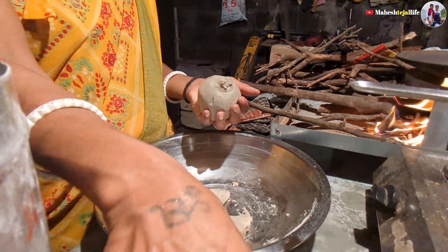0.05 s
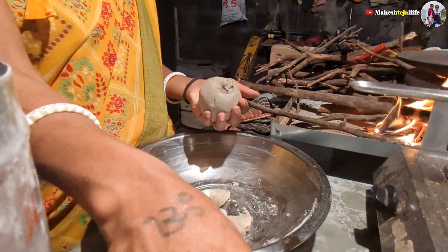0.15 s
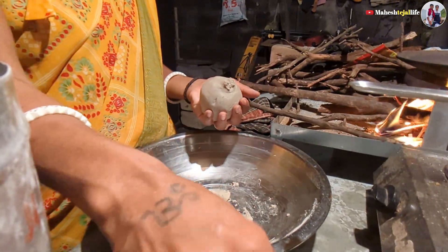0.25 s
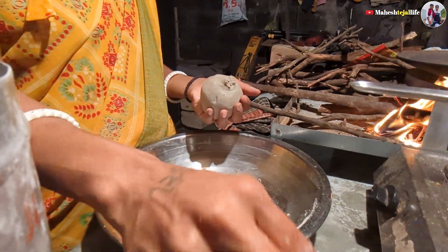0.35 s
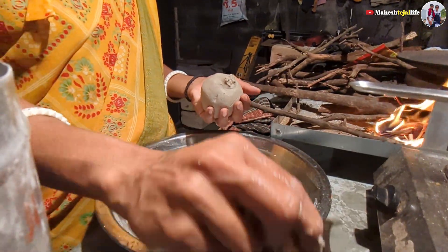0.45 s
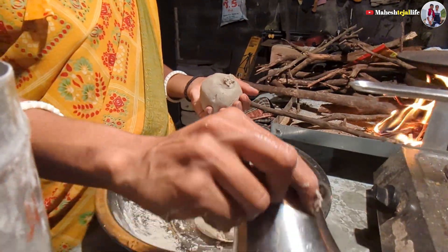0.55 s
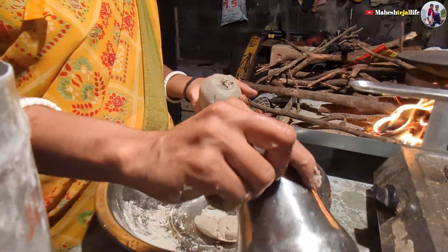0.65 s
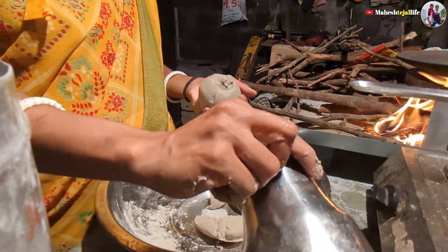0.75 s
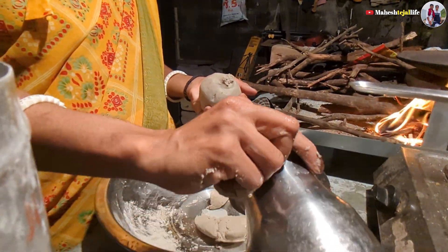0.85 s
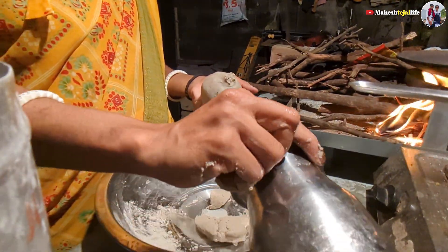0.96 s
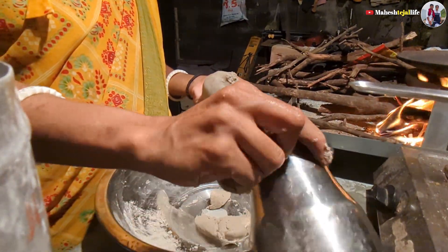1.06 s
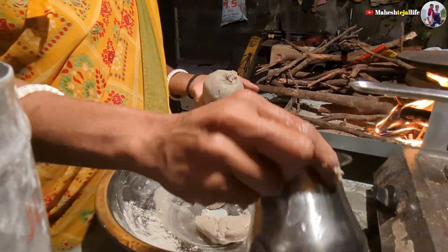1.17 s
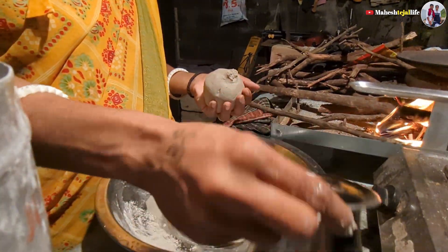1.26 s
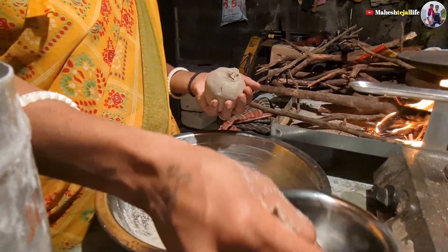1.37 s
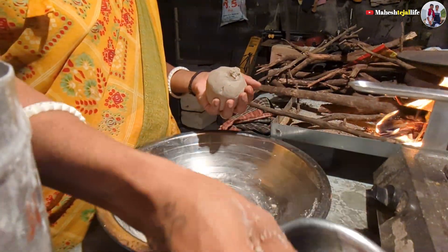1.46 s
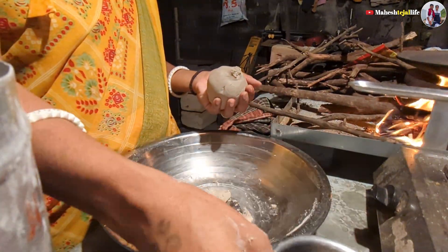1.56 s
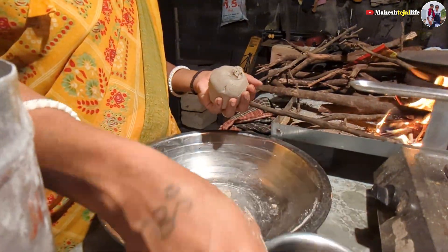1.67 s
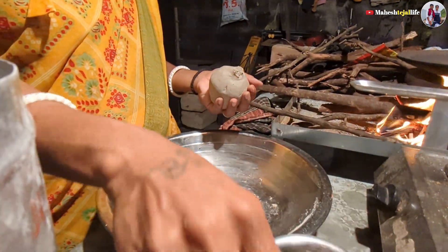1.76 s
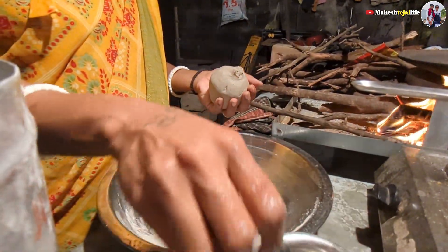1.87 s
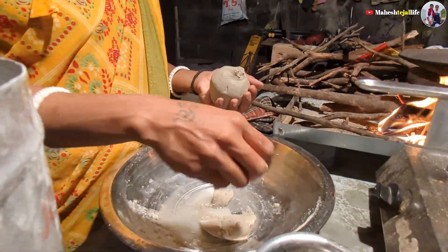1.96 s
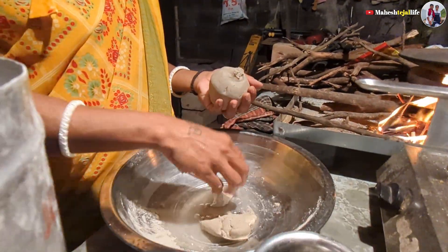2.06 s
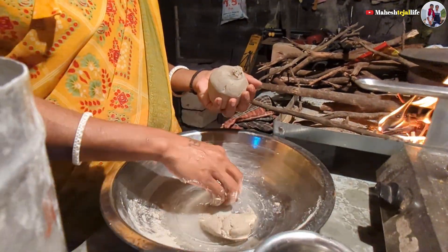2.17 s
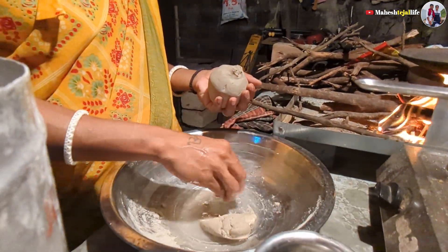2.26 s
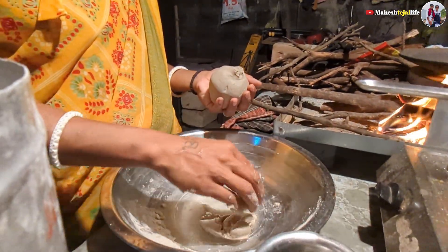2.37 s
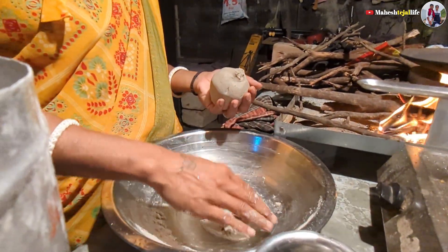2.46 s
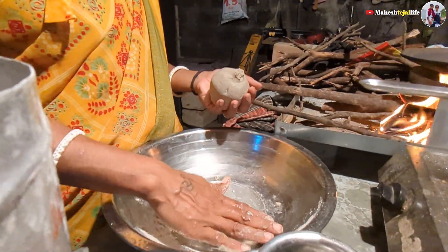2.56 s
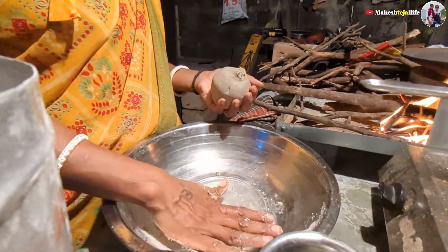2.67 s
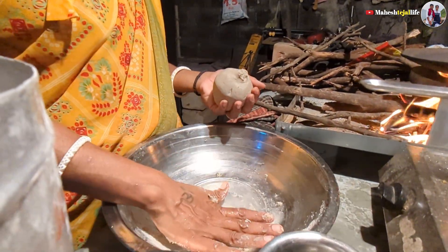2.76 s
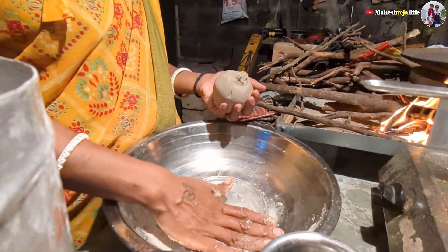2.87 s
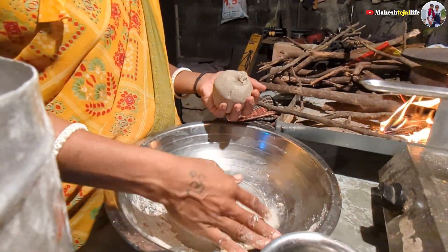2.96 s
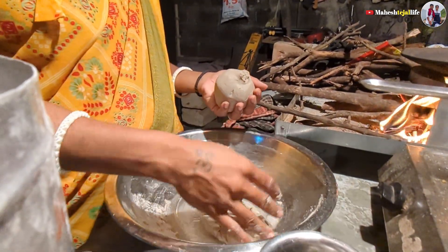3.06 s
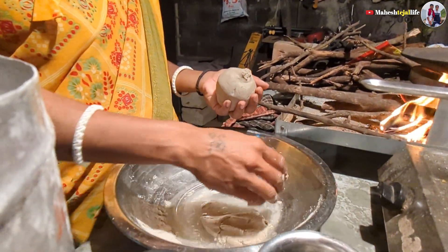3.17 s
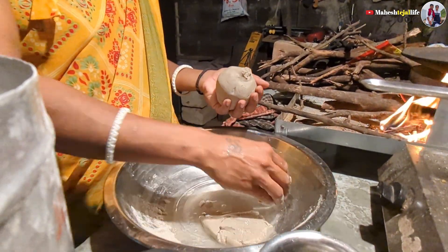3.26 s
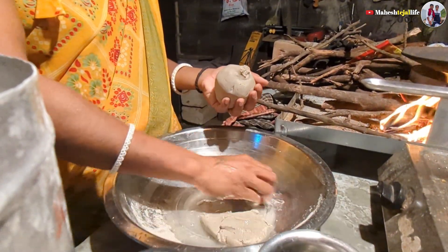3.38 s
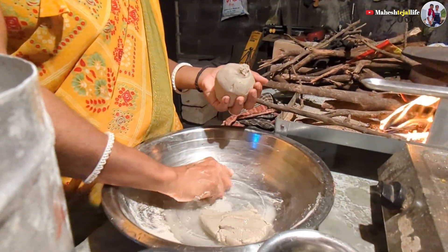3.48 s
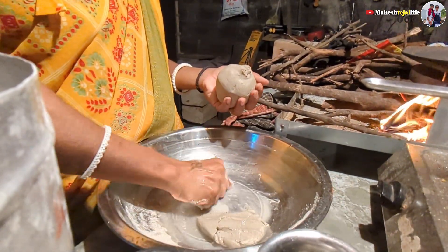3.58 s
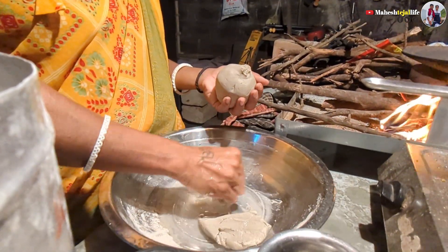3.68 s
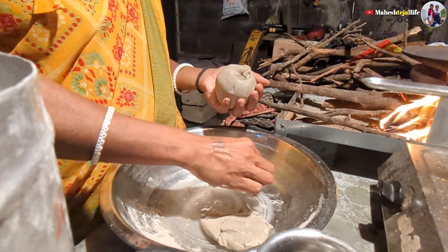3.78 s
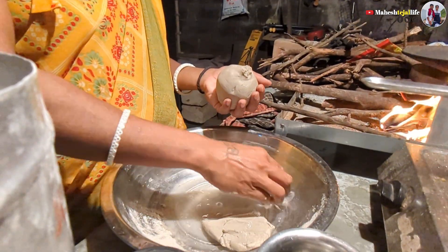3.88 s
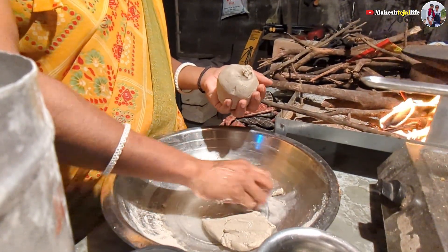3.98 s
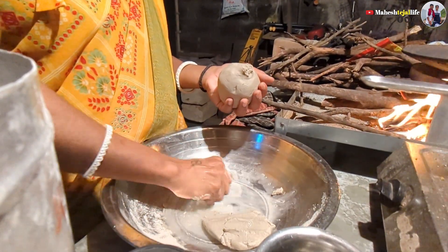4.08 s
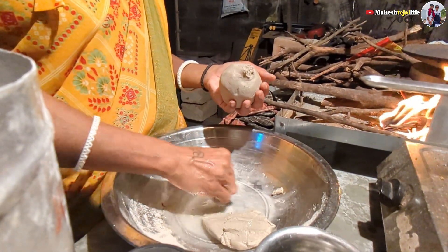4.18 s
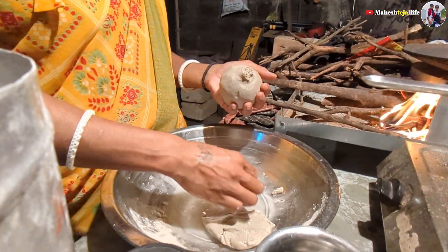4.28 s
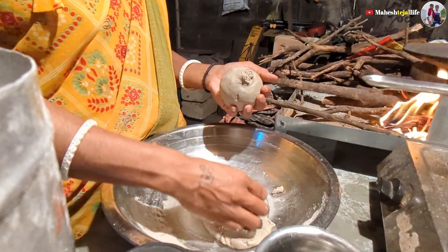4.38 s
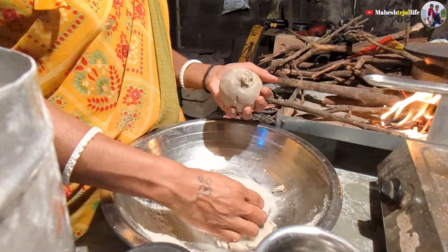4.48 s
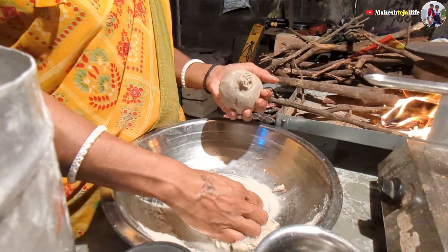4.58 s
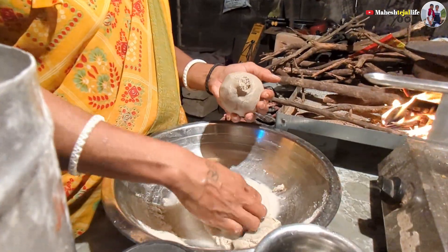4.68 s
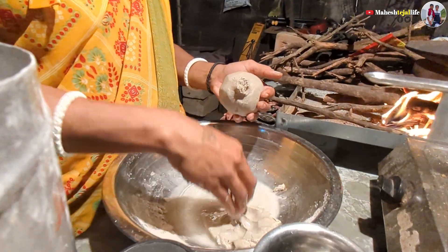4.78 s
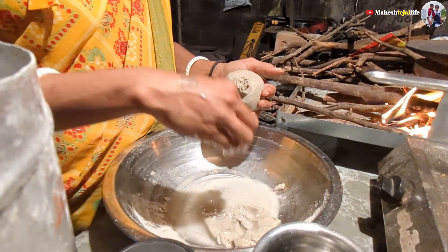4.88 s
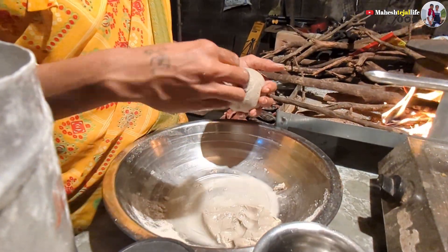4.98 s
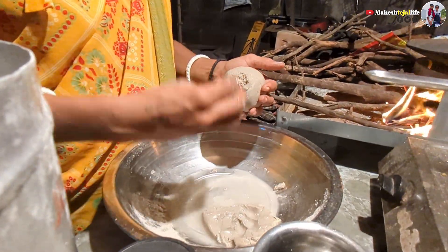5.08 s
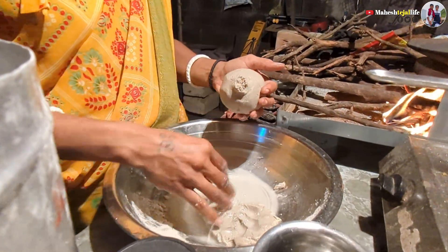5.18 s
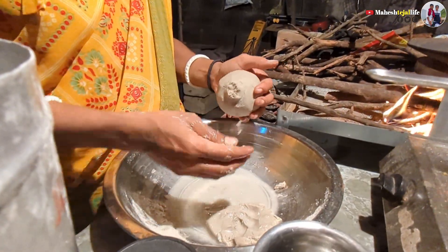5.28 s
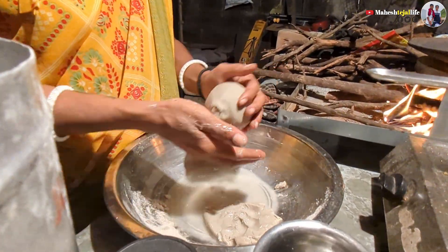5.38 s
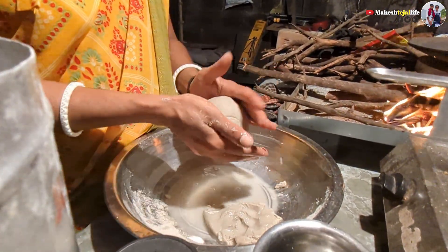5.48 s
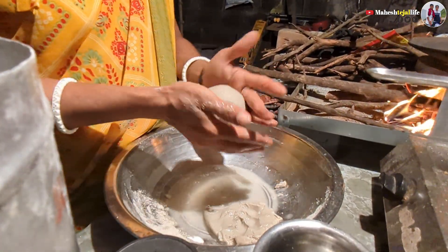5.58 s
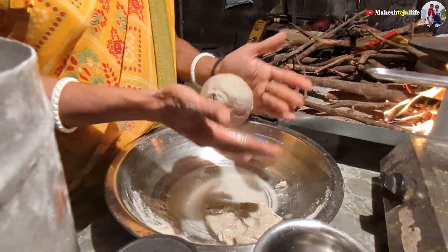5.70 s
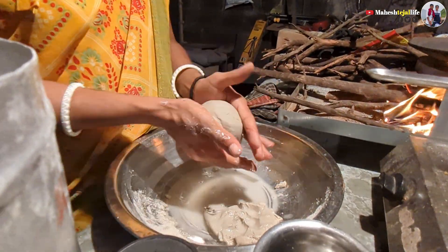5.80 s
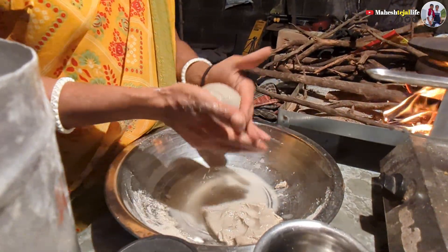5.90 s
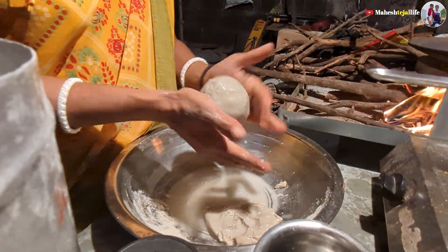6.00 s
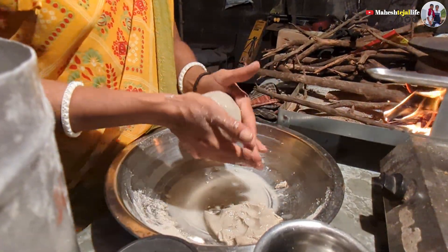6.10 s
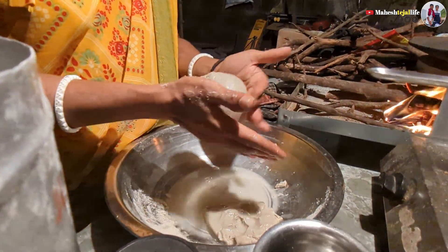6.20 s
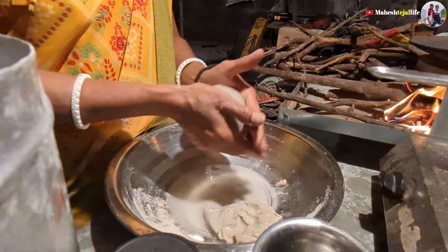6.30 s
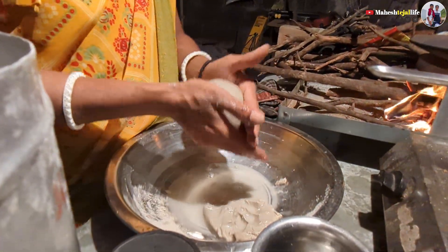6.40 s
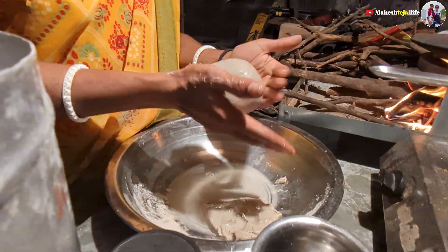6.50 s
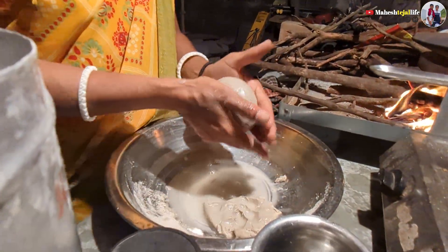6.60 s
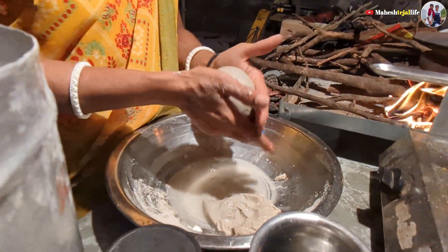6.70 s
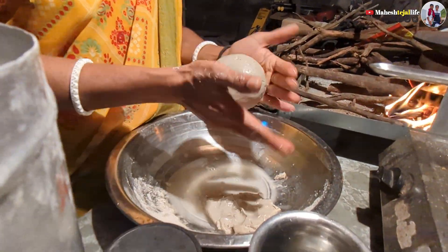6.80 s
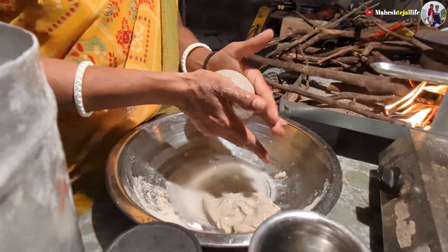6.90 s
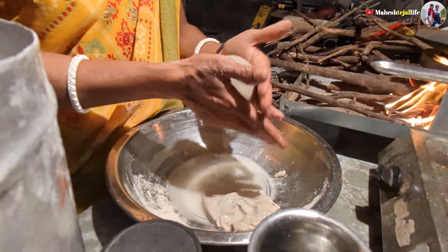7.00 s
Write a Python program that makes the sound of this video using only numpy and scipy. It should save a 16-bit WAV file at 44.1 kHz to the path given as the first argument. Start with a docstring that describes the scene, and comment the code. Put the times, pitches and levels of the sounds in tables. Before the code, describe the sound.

Close, slightly dull stereo pickup in a quiet open-air kitchen with near walls. Faint rubbing and light ticks come first, then a steel pot is set down with a rattling clank and brief squeak. Wet smacks and busy kneading rubs follow in a steel bowl, with small squelches, ending in separate hollow palm pats. A low distant engine hum fades underneath.

```python
"""Wet fingers rub dough in a steel bowl over a far engine's hum and the hiss of an open-air kitchen yard;
smacks, pats, dull thuds and squelches follow. A steel water pot is set down, rings and squeaks; the bowl rings dully.
Rubbing, smacks, squelches and yard are filtered noise; steel and thuds are fading modes, the engine
sines over rumble, the squeak a fluttering sine. Walls add a short tail; a two-port microphone dulls it all."""
import sys
import numpy as np
from scipy import signal
from scipy.io import wavfile
from scipy.ndimage import uniform_filter1d

SR = 44100
rng = np.random.default_rng(int(sys.argv[2]) if len(sys.argv) > 2 else 0)


def dump(signal):
    """Clip the signal to [-1, 1] and save it as 16-bit WAV at the path in sys.argv[1]."""
    limited = np.clip(np.atleast_2d(signal).T, -1, 1)
    pcm = np.round(limited * 32767).astype(np.int16)
    wavfile.write(sys.argv[1], SR, pcm)


N = 310905
TIME_S = np.arange(N) / SR

# Strokes of wet fingers over dough, steel and cloth: start_s, length_s, treble_db, middle_rel_treble_db
STROKES = [(0, 0.091, -50.5, -7), (0.14, 0.094, -59, -4), (0.842, 0.038, -54, 2), (1.233, 0.12, -56.5, 2.5),
           (1.613, 0.16, -58.5, 8.5), (1.859, 0.064, -58, 17), (2.026, 0.021, -70, 0),
           (2.207, 0.13, -70.5, 11.5), (2.409, 0.021, -58, 17), (2.567, 0.11, -41.5, -1),
           (2.684, 0.053, -59.5, 9.5), (2.867, 0.075, -49.5, 1.5), (3.027, 0.23, -49, 0),
           (3.332, 0.14, -48, 1.5), (3.506, 0.046, -35.5, -3.5), (3.624, 0.14, -43.5, -11.5),
           (3.783, 0.32, -46.5, -8), (4.135, 0.049, -46, -6.5), (4.205, 0.11, -74, 20),
           (4.414, 0.14, -49.5, -1.5), (4.709, 0.115, -47.5, -4), (5.088, 0.11, -63.5, 12),
           (5.441, 0.044, -52, 9), (6.045, 0.095, -55, 9), (6.241, 0.038, -61, 16), (6.317, 0.028, -38, 2),
           (6.566, 0.069, -62, 12), (6.758, 0.078, -72, 12.5), (6.863, 0.024, -62, 13),
           (6.962, 0.1, -66, 9.5)]
# Rustle of cloth and hands under and between the strokes, before layer offsets: time_s, level_db
RUSTLE = [(0.0, -64.5), (1.59, -63.5), (1.71, -46.5), (2.3, -61.5), (2.8, -71), (3.3, -56.5), (3.91, -49.5),
          (4.51, -68.5), (7.05, -60.5)]
# Treble resonances of the rubbed film: centre_hz, first_pass_width_hz, relative_level_db
FILM_BANDS = [(3058, 2130, 8), (4310, 1400, 5.5), (6550, 3700, 1.5)]
# Smacks and pats of wet film: time_s, peak_db, centre_hz, broad_crack_share (0-1)
SMACKS = [(0.153, -38, 4500, 0.4), (1.056, -35.5, 2380, 1), (1.264, -36, 4670, 0.5), (1.318, -37, 4000, 1),
          (1.748, -28, 5170, 0.3), (1.874, -31.5, 1440, 0.4), (1.909, -28.5, 1370, 1),
          (2.417, -36.5, 1520, 0.1), (2.535, -42.5, 4300, 0.3), (2.58, -35.5, 4000, 1),
          (2.611, -22, 4060, 0.6), (2.647, -17.5, 4050, 0.76), (2.711, -24.5, 3720, 0.9),
          (2.924, -31, 3820, 1), (2.953, -34.5, 4800, 0.6), (3.09, -24, 1320, 0.2),
          (3.12, -22.5, 1640, 0.33), (3.144, -17.5, 3660, 1), (3.196, -21.5, 1290, 0.9),
          (3.248, -38, 3000, 1), (3.53, -23, 4470, 1), (3.813, -33, 1300, 0.4), (3.931, -25.5, 4300, 0.27),
          (4.03, -30, 4250, 1), (4.138, -29, 2100, 0.01), (4.453, -27.5, 2420, 0.8),
          (4.523, -28.5, 830, 0.54), (4.555, -37.5, 4400, 0.3), (4.725, -25.5, 1550, 1),
          (4.79, -32.5, 2450, 0.7), (4.822, -36.5, 4800, 0.3), (4.92, -43, 2500, 1), (5.09, -40, 1890, 0.4),
          (5.205, -41.5, 6070, 0.6), (5.459, -26, 2010, 1), (5.794, -18, 2170, 0.4),
          (6.058, -15.5, 3240, 1), (6.323, -22, 1900, 1), (6.404, -33.5, 4100, 1), (6.605, -35, 2800, 0.8),
          (6.62, -22.5, 4040, 1), (6.877, -34, 3140, 1), (6.89, -33, 2600, 1)]
# Air pockets in the wet dough and the rubbed bowl: start_s, length_s, pitch_hz, rms_db
SQUELCHES = [(3.336, 0.041, 1350, -49), (3.386, 0.03, 1490, -46), (4.012, 0.06, 650, -42),
             (4.092, 0.055, 1213, -56), (4.141, 0.1, 665, -48), (4.226, 0.093, 1936, -54),
             (4.666, 0.07, 4310, -62), (5.128, 0.09, 1910, -53.5), (5.468, 0.017, 1900, -42),
             (6.245, 0.012, 1590, -33), (6.762, 0.073, 3920, -60.5)]
# Dull knocks of table and cupped palms: start_s, level_db, pitch_hz
THUDS = [(2.283, -15.5, 164), (2.289, -17, 159), (3.088, -17.5, 310), (3.119, -19, 296),
         (5.795, -19.5, 440), (6.057, -23.5, 450), (6.068, -22, 538), (6.323, -28, 395), (6.618, -31, 554)]
# Table booms under the heaviest press: start_s, level_db, pitch_hz
BOOMS = [(3.149, -31.5, 54.5), (3.202, -36, 118.8)]
# Blows on the pot: start_s, level_db, outer_db (crack and modes outside 1500-3000 Hz), rattle_decay_s (to 1/e)
# A touch on the rim wakes only the middle modes.
POT_BLOWS = [(1.318, -30, -26, 0.015), (1.584, -12.5, 3, 0.007), (1.588, -13.5, -4.5, .02),
             (1.603, -10.5, -11, 0.022), (1.65, -22, -20.5, 0.045)]
# Modes of the pot: pitch_hz, relative_level_db, t60_s, left_minus_right_db
POT_MODES = [(135, -18, 0.17, 5.5), (217, -19, 0.033, 2), (280.2, 0, 0.12, -1), (310, -8.5, .12, -9.5),
             (386, -2, 0.074, 6), (446.4, -3, 0.1, -5), (678, 0, 0.035, 5.5), (740, -8.5, 0.045, 9),
             (1162, -24, 0.19, -2.5), (1976, -17, 0.2, 3.5), (2024, -12, 0.11, 14), (2100, -18.5, 0.22, 4),
             (2374, -23, 0.13, -6.5), (2400, -27, 0.3, 3), (3210, -32, 0.078, 0), (3750, -24, 0.21, 3),
             (5130, -16.5, 0.11, 0.5), (5070, -9, 0.044, 6), (5500, -20.5, 0.095, -3.5),
             (6150, -32.5, 0.043, -3.5)]
# Nudges of the bowl: start_s, level_db, outer_db (as for the pot), rattle_decay_s (to 1/e)
BOWL_BLOWS = [(2.61, -48, -1, 0.008), (2.648, -44, 0.5, 0.018), (2.712, -45.5, 1, 0.0061),
              (3.143, -28.5, 0, 0.0049), (3.165, -37, 7, 0.081)]
# Modes of the bowl: pitch_hz, relative_level_db, t60_s, left_minus_right_db
BOWL_MODES = [(200, -8, 0.071, 0), (310, -2, 0.066, -4), (421, 2, 0.082, -13.5), (577, 0.5, 0.041, 11),
              (665, 3, 0.053, 12)]
# Far engine, relative levels: time_s, hum_db, rumble_db
ENGINE = [(0.0, -48, -40), (0.23, -42.5, -41.5), (1.82, -46, -44.5), (3.02, -60.5, -46.5),
          (3.22, -57, -40.5), (5.1, -59.5, -49.5), (7.05, -67.5, -47.5)]
# Engine orders: multiple_of_turn_rate, relative_level_db
ENGINE_ORDERS = [(2, 0), (3, -3)]
# Spectrum of the yard air: frequency_hz, relative_band_level_db
YARD_SPECTRUM = [(88, -31), (150, -10.5), (308, -2.5), (357, -24.5), (457, -7.5), (823, -10), (1510, -12.5),
                 (4090, -19.5), (6470, -30.5), (7500, -34), (9750, -71), (16500, -120)]

# A duller stroke brings more low band and leans right
LOW_REL_TREBLE_DB, LOW_DB_PER_MIDDLE_DB = -2.5, 0.88
STROKE_LEFT_MINUS_RIGHT_DB, PAN_DB_PER_MIDDLE_DB = 0.3, -0.22
SMACK_T60_S, SMACK_LEFT_MINUS_RIGHT_DB, SMACK_PAN_SPREAD_DB = 0.0083, 2.0, 1
POCKET_WIDTH_SHARE, POCKET_BLUR_CYCLES = 0.041, 3.3  # width = share of pitch + cycles / length
THUD_T60_S, BOOM_T60_S = 0.022, 0.42
SQUEAK_S, SQUEAK_LENGTH_S, SQUEAK_DB, SQUEAK_FADE_DB_PER_S = 1.69, 0.165, -42, 70
SQUEAK_HZ, SQUEAK_SAG_HZ = 2523, 300
ENGINE_HZ, YARD_RMS_DB, WHISPER_RMS_DB = 37.86, -58.5, -79.5
WALL_T60_S, WALL_DB = 0.22, -15.5
MIC_HZ, MIC_LEAK_DB, TOP_HZ = 6840, -25.5, 10000


def undb(db):
    """Gain of a level in dB."""
    return 10 ** (np.asarray(db) / 20)


def level(x, rms_db):
    """The sound scaled to an rms level."""
    return x * undb(rms_db) / np.sqrt(np.mean(x ** 2))


def band(x, hz, width_hz):
    """Two-pole resonance, gain 1 at the centre."""
    return signal.lfilter(*signal.iirpeak(hz, hz / width_hz, SR), x)


def walk(rate_hz):
    """Random levels held 1 / rate_hz and slewed twice; spread near 1."""
    hold_samples = int(SR / rate_hz)
    steps = rng.standard_normal(size=int(TIME_S[-1] * rate_hz) + 1)
    held = steps[(TIME_S * rate_hz).astype(int)]
    return 1.87 * uniform_filter1d(uniform_filter1d(held, hold_samples), hold_samples)


def pair(make, alike):
    """Left and right from a shared and an opposed noise; alike is their correlation."""
    alike = np.clip(alike, 0, 1)
    shared = np.sqrt((1 + alike) / 2) * make()
    opposed = np.sqrt((1 - alike) / 2) * make() * np.array([[1], [-1]])
    return shared + opposed


def add(out, start_s, sound):
    """Mixes a sound in at start_s."""
    k = int(start_s * SR)
    out[..., k:k + sound.shape[-1]] += sound[..., :N - k]


def ring(t, hz, t60_s, phase=0.):
    """One exponentially fading mode."""
    return np.sin(2 * np.pi * hz * t + phase) * np.exp(-np.log(1000) * t / t60_s)


def rubbing():
    """Dense tiny snaps of wet film, uneven in size, ring the hollows of hand and bowl; strokes swell over rustle."""
    snap_size = undb(3.0 * np.minimum(rng.exponential(size=N), 4.5) + 2.6 * walk(70))

    def film_noise():
        """Sparse snaps, about 3000 per s, over steady noise."""
        snaps = snap_size * (rng.random(N) < 3000 / SR) * rng.standard_normal(N)
        return snaps + 0.59 * rng.standard_normal(N)

    film = pair(film_noise, 0.39)
    treble = sum(undb(db + walk(60)) * band(band(film, hz, width_hz), hz, 2 * width_hz)
                 for hz, width_hz, db in FILM_BANDS)
    middle = sum(undb(walk(60)) * band(band(film, hz, 0.83 * hz), hz, 0.64 * hz) for hz in (1400, 2100))
    low = undb(walk(30)) * band(band(film, 570, 750), 520, 900)

    rustle = undb(np.interp(TIME_S, *np.transpose(RUSTLE)))
    gains = np.zeros((3, 2, N)) + rustle * undb([-2.5, -5.0, -8.0])[:, None, None]  # layer, port, time
    for start_s, length_s, treble_db, middle_db in STROKES:
        low_db = LOW_REL_TREBLE_DB + LOW_DB_PER_MIDDLE_DB * middle_db
        pan_db = STROKE_LEFT_MINUS_RIGHT_DB + PAN_DB_PER_MIDDLE_DB * middle_db
        t = TIME_S[:int((length_s + .1) * SR)]
        # quick start, slight fade through the stroke, short tail
        fade = np.exp(-.4 * t / length_s - np.maximum(t - length_s, 0) / 0.023)
        shape = np.minimum(t / 0.025, 1) * fade
        layer_db = treble_db + np.add.outer([0, middle_db, low_db], [pan_db / 2, -pan_db / 2])
        add(gains, max(start_s, 0), undb(layer_db)[..., None] * shape)
    return sum(level(layer, 0) * gain for layer, gain in zip((treble, middle, low), gains))


def smacks():
    """A wet film snaps: a short burst of noise round its centre with a fainter sticky tail."""
    out, t = np.zeros((2, N)), TIME_S[:SR // 10]
    attack = (1 - np.exp(-t / 0.0017)) ** 2
    shape = attack * (np.exp(-np.log(1000) * t / SMACK_T60_S) + undb(-28.5) * np.exp(-t / 0.018))
    for time_s, peak_db, hz, broad in SMACKS:
        pan_db = SMACK_LEFT_MINUS_RIGHT_DB + SMACK_PAN_SPREAD_DB * rng.standard_normal()
        noise = pair(lambda: rng.standard_normal(len(t)), 0.67)
        colour = band(band(noise, hz, hz), hz, hz) + broad * band(noise, 1800, 4600)
        snap = colour * shape
        snap = snap / abs(snap.mean(axis=0)).max()  # unit peak of the two-port mean
        add(out, time_s - .0012, undb(peak_db + np.array([[pan_db], [-pan_db]]) / 2) * snap)
    return out


def squelches():
    """A puff of noise rings a narrow pocket of air."""
    out, t = np.zeros((2, N)), TIME_S[:SR // 10]
    for start_s, length_s, hz, db in SQUELCHES:
        width_hz = POCKET_WIDTH_SHARE * hz + POCKET_BLUR_CYCLES / length_s
        shape = np.sin(np.pi * np.minimum(t / length_s, 1) ** 0.29)
        puff = pair(lambda: rng.standard_normal(len(t)), 0.43) * shape
        pocket = band(band(puff, hz, width_hz), hz, 2 * width_hz)
        over_length = np.sqrt(length_s * SR / len(t))  # rms counted over length_s
        add(out, start_s, level(pocket, db) * over_length * undb([[-1.5], [1.5]]))
    return out


def thuds(blows, t60_s):
    """Soft blows swing the table as a fading mode, 5 dB louder at the left port and lagging at the right."""
    out, t = np.zeros((2, N)), TIME_S[:SR // 2]
    for start_s, db, hz in blows:
        swing = np.minimum(t / 0.0019, 1) * ring(t, hz, t60_s, np.array([[.3], [-.3]]))
        add(out, start_s, undb(db + np.array([[2.5], [-2.5]])) * swing)
    return out


def steel(blows, modes, crack_db):
    """A blow and the rattle after it drive every mode; the two ports see each mode in another phase."""
    out, t = np.zeros((2, N)), TIME_S[:SR // 2]
    # dents split each mode into three close ones, wider apart with pitch
    split = .016 * rng.standard_normal((len(modes), 3, 1, 1)) * np.array([0, 1, 1])[:, None, None]
    phases = 1.2 * rng.standard_normal((len(modes), 3, 2, 1))
    for start_s, db, outer_db, rattle_s in blows:
        crack = band(rng.standard_normal((2, len(t))), 3800, 4600) * np.exp(-t / 0.027)
        body = undb(crack_db + outer_db) * crack
        for (hz, mode_db, t60_s, pan_db), apart, phase in zip(modes, split, phases):
            outside = abs(hz - 2250) > 750
            port_db = mode_db - 5.5 + outer_db * outside + np.array([[pan_db], [-pan_db]]) / 2
            high = min(hz / 450, 1)  # low modes split and differ in phase less
            trio = ring(t, hz * (1 + high * apart), t60_s, high * phase).sum(axis=0)
            body += undb(port_db) * np.minimum(t / 0.0014, 1) * trio
        chatter = rng.standard_normal(len(t)) * np.exp(-t / rattle_s)
        drive = 0.95 * chatter / np.sqrt(np.sum(chatter ** 2)) + (t == 0)  # rattle + single blow
        add(out, start_s, undb(db) * signal.fftconvolve(body, drive[None], axes=1)[:, :len(t)])
    return out


def squeak():
    """Settling pot, metal on stone: a fluttering whistle, fading evenly in dB, sagging at 50-80 % of its length."""
    done = np.clip((TIME_S - SQUEAK_S) / SQUEAK_LENGTH_S, 0, 1)
    hz = SQUEAK_HZ - SQUEAK_SAG_HZ * np.clip((done - .5) / .3, 0, 1)
    phase = 2 * np.pi * np.cumsum(hz * (1 + 0.0149 * walk(300))) / SR
    gate = np.minimum(np.minimum(done, 1 - done) * SQUEAK_LENGTH_S / 0.015, 1)
    fade_db = SQUEAK_FADE_DB_PER_S * done * SQUEAK_LENGTH_S
    return np.sin(phase) * gate * undb(SQUEAK_DB - fade_db + 2.5 * walk(110))


def engine():
    """Two wavering orders of a slow engine, the same at both ports, over a nearly common noise rumble."""
    time_s, hum_db, rumble_db = np.transpose(ENGINE)
    turn = 2 * np.pi * np.cumsum(ENGINE_HZ * (1 + 0.0034 * walk(1.925))) / SR
    hum = sum(undb(db + 1.3 * walk(2.3)) * np.sqrt(2) * np.sin(order * turn) for order, db in ENGINE_ORDERS)
    noise = pair(lambda: rng.standard_normal(N), 0.83)
    rumble = band(band(noise, 83.2, 40), 56, 60)
    rumble = rumble + 0.48 * band(band(noise, 101.2, 45), 125, 170) + 0.17 * band(noise, 40, 39.9)
    hum_gain = undb(np.interp(TIME_S, time_s, hum_db))
    rumble_gain = undb(np.interp(TIME_S, time_s, rumble_db))
    return hum * hum_gain + level(rumble, -4.5) * rumble_gain


def yard():
    """Half-octave-spaced bands of outdoor air and fire hiss swell together, flicker alone; a thin hiss comes and goes."""
    air, swell, (hzs, dbs) = 0, walk(0.65), np.transpose(YARD_SPECTRUM)
    for hz in 150 * 2 ** np.arange(0, 5.8, .5):
        noise = pair(lambda: rng.standard_normal(N), 130 / hz + 0.22)  # ports differ more with pitch
        db = np.interp(np.log(hz), np.log(hzs), dbs) + 4.17 * swell + 0.95 * walk(5.8)
        air = air + undb(db) * band(band(noise, hz, hz / 2), hz, hz / 2)
    whisper = undb(10.0 * walk(11.0)) * pair(lambda: band(rng.standard_normal(N), 6500, 500), 0.38)
    return level(air, YARD_RMS_DB) + level(whisper, WHISPER_RMS_DB)


def walls(near):
    """Near walls return a short diffuse tail, another one to each port."""
    t = TIME_S[:SR // 2]
    fade = np.minimum(t / 0.0065, 1) * np.exp(-np.log(1000) * t / WALL_T60_S)
    tail = rng.standard_normal((2, len(t))) * fade
    tail = tail * undb(WALL_DB) / np.sqrt(np.sum(tail ** 2) / 2)
    return signal.fftconvolve(near.mean(axis=0)[None], tail, axes=1)[:, :N]


def scene():
    """All sources at the two ports; the walls answer steel, smacks, squelches and thuds."""
    near = steel(POT_BLOWS, POT_MODES, crack_db=-16.0) + steel(BOWL_BLOWS, BOWL_MODES, crack_db=-17)
    near = near + smacks() + squelches() + thuds(THUDS, THUD_T60_S) + thuds(BOOMS, BOOM_T60_S)
    return near + walls(near) + squeak() + rubbing() + engine() + yard()


def record(dry):
    """The microphone loses deepest bass, drops to a faint treble shelf and clips; a low-pass ends the sound at 10 kHz."""
    dry = signal.sosfilt(signal.butter(2, 42, "high", fs=SR, output="sos"), dry)
    steep = signal.cheby1(8, 1, MIC_HZ, fs=SR, output="sos")
    dull = signal.sosfilt(steep, dry) + undb(MIC_LEAK_DB) * dry
    final_low_pass = signal.ellip(8, .2, 70, TOP_HZ, fs=SR, output="sos")
    return signal.sosfilt(final_low_pass, np.clip(dull, -1, 1))


dry = scene()
out = record(dry)
dump(out)
```